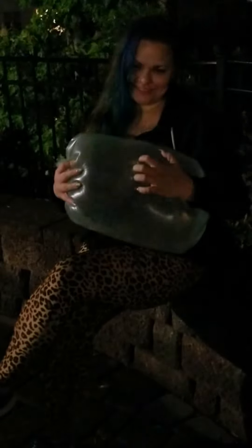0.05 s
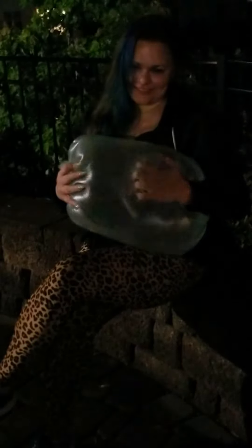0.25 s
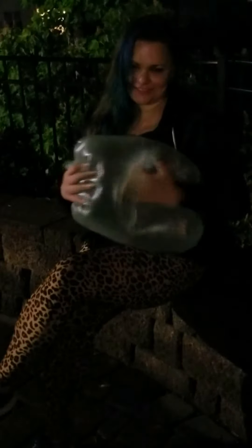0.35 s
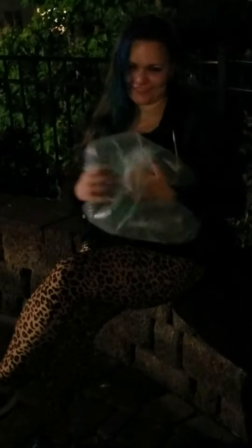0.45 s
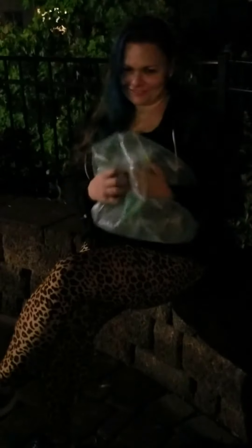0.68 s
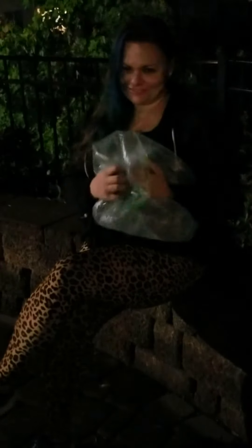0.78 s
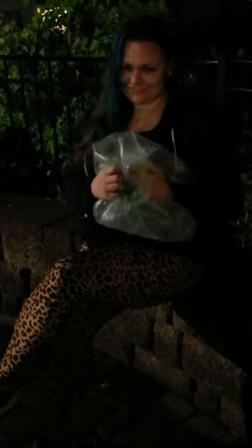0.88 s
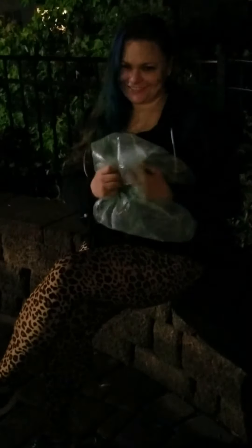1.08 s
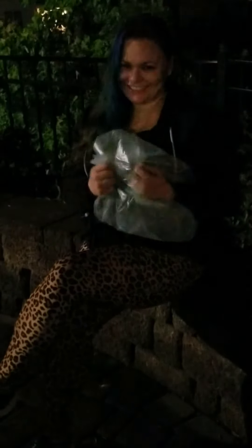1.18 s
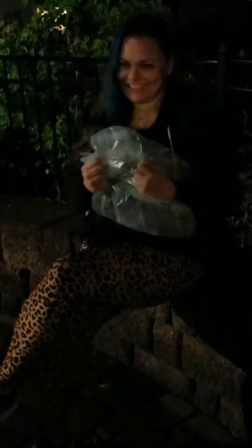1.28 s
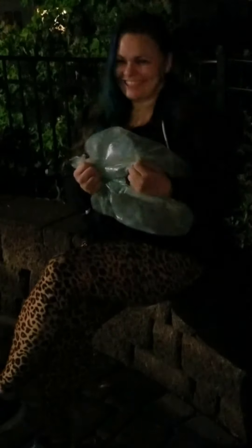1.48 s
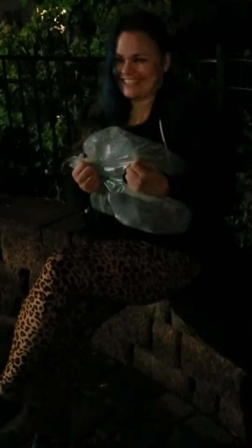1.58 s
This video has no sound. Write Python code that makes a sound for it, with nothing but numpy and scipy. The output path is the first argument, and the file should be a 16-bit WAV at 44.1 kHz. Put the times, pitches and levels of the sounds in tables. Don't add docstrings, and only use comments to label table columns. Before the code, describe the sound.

An inflated plastic bag bursts between two hands in three sharp, overloaded pops, outdoors at night

```python
import sys
import numpy as np
from scipy import signal
from scipy.fft import rfft, irfft
from scipy.io import wavfile
from scipy.ndimage import uniform_filter1d

SR = 44100
rng = np.random.default_rng(int(sys.argv[2]) if len(sys.argv) > 2 else 0)


def dump(signal):
    limited = np.clip(np.atleast_2d(signal).T, -1, 1)
    pcm = np.round(limited * 32767).astype(np.int16)
    wavfile.write(sys.argv[1], SR, pcm)


def to_linear_factor(level_db):
    exponent = np.asarray(level_db, float) / 20
    return 10 ** exponent


N = 72765

# (time [s], boom [dB], deep boom [dB], flap [dB], crack [dB])
SNAPS = [
    (0.2168, -31, -20, -14.5, -29.5),
    (0.2185, -6, -7, -3.5, -14),
    (0.2193, -7.5, -10, -4, -1.5),
    (0.2255, -11, -10, -26, -17),
    (0.2292, -16.5, -10.5, -16.5, -23.5),
    (0.2348, -16, -21, -23, -30.5),
    (0.2396, -13, -17, -4.5, -17.5),
    (0.2443, -15, -16.5, -17, -29),
    (0.3302, 0.5, -8.5, -2.5, -11),
    (0.4232, -1.5, -9, -4, -18),
]
# (frequency ratio [1], level [dB])
BOOM_PARTIALS = [(1.001, -.5), (1.74, -6.5), (2.2, -14)]
BOOM_T60_S = np.array([[.024], [.027]])
# (frequency [Hz], left level [dB], right level [dB])
FLAP_MODES = [(1282, 3, 4), (1472, -15.5, -9.5), (2050, -0.5, -1), (2800, -1, 2), (3295, -4, -3.5),
              (3690, -16, -7.5), (4940, -9.5, -8.5), (6340, -14, -14)]
# (frequency [Hz], level [dB])
CRACK_SPECTRUM = [(290, -22), (500, 0), (1660, -6), (4170, -13), (6160, -10.5), (7120, -14.5),
                  (11100, -17.5), (15800, -40.5)]
# (left level [dB], right level [dB])
PUSH_DB = [-6.5, -8.5]
# (left level [dB], right level [dB])
ECHO_DB = [-20.5, -8.5]
# (frequency [Hz], level [dB])
RATTLE_SPECTRUM = [(120, -24.5), (200, 1.5), (1470, -11.5), (5770, -26), (9440, -31), (10700, -31.5),
                   (12200, -24), (15800, -43.5)]
# (time [s], length [s], level [dB])
RATTLES = [
    (0.2134, 0.035, -18.5),
    (0.3261, 0.019, -18.5),
    (0.4209, 0.014, -18),
]
# (time [s], level [dB], frequency [Hz])
HEAVES = [
    (.238, -16, 109),
    (.343, -39.5, 92),
    (0.342, -24.5, 200),
    (.428, -18, 169.3),
    (0.6, -43, 111.9),
]
# (time [s], frequency [Hz], level [dB], width [cycles])
BUMPS = [
    (.483, 335, -44, 3),
    (1.513, 290, -39, 2.2),
    (1.531, 320, -49, 4.5),
]
# (time [s], level [dB])
FLOW = [(.213, -77.5), (.22, -34.5), (.26, -36), (.33, -33.5), (.37, -35.5), (.42, -39), (.455, -44.5),
        (.482, -42), (.5, -53.5), (.56, -57)]
# (frequency [Hz], level [dB])
JET_SPECTRUM = [(88, -41.5), (150, -8.5), (450, -10.5), (1000, -6.5), (1450, -11), (2100, -8),
                (2800, -11.5), (15800, -25)]
# (time [s], frequency [Hz], level [dB])
WHISTLE = [(.246, 1350, -30.5), (.27, 1344, -31.5), (.29, 1330, -33), (.301, 1268, -37.5),
           (.325, 1270, -40)]
# (time [s], frequency [Hz], level [dB])
SQUEAK = [(.262, 2720, -46), (.27, 2800, -53), (.277, 2890, -45), (.284, 2820, -42), (.29, 2740, -60.5)]
# (time [s], frequency [Hz], level [dB])
SPLIT = [(.303, 1380, -47), (.31, 1350, -47), (.322, 1400, -50)]
# (delay [s], share [1])
PORT_ECHOES = [(.00057, 0.67), (.00085, -0.19), (.00112, -0.5), (.00132, .45), (.0016, -0.12)]
# (frequency [Hz], level [dB])
WIND_SPECTRUM = [(20, -22), (45, -2.5), (70, 2.5), (130, -5), (200, -13.5), (400, -30), (700, -60)]
# (time [s], level [dB])
GUST = [(0, 5.5), (.6, 1), (1.0, -2), (1.15, 2), (1.3, 7), (1.42, 3.5), (1.55, -4), (1.65, -3.5)]
# (time [s], level [dB], frequency [Hz], phase split between ports [rad])
PUFFS = [(0.018, -29.5, 101.6, 1.4), (0.121, -46, 71.4, 0.28), (0.197, -39, 74.6, 0.65),
         (0.529, -53, 81, 1.7), (0.592, -45, 103, .5), (0.632, -38, 100, 0.56), (0.709, -36.5, 63.3, .5),
         (.775, -40.5, 90, 1.3), (0.82, -34, 71.1, 0.31), (1.05, -44, 79, 0.82), (1.101, -43.5, 64.3, .5),
         (1.128, -43, 98, 1.17), (1.226, -36.5, 90, 0.74), (1.286, -39, 100, 0.65),
         (1.323, -36.5, 114, 0.94), (1.37, -39.5, 69.7, 1.8), (1.496, -40.5, 74.8, 0.3)]
# (start [s], length [s], frequency [Hz], level [dB], right port phase lag [rad])
INSECTS = [(0, 0.06, 1123, -57.5, 7.5), (0.546, 0.18, 2790, -63.5, 0), (0.565, 0.27, 2650, -60.5, 4),
           (.68, 0.23, 895.4, -61, 4), (0.794, 0.11, 2930, -62.5, 2), (.68, 0.19, 1198, -65.5, -1),
           (.9, .16, 2480, -67.5, 5.5), (.92, .13, 2840, -63.5, -2.1), (1.102, 0.25, 900, -58.5, 2.4),
           (1.13, 0.22, 1130, -62.5, -0.98), (1.02, 0.11, 3150, -67, 1), (1.159, 0.13, 3140, -65, 2),
           (1.384, 0.26, 2320, -61, 2.5), (1.43, .06, 2800, -63, 4), (1.512, 0.12, 2720, -60.5, 4),
           (1.361, 0.075, 1089, -63.5, -0.5), (1.5, 0.12, 1189, -60.5, 0.8), (1.498, 0.17, 919, -63, 3.5)]
# (frequency [Hz], level [dB])
NIGHT_SPECTRUM = [(200, -6.5), (350, -5), (700, -20.5), (1120, -6.5), (1630, -12), (2880, -11.5),
                  (3460, -17), (15800, -25)]
# (frequency [Hz], level [dB])
FAR_SPECTRUM = [(120, -31.5), (220, 1), (400, -3.5), (700, -11), (1100, -9.5), (1800, -29), (15800, -70)]
# (time [s], level [dB])
FAR_SWELL = [(0, 5), (.2, 2.5), (.5, 6), (0.749, 1.5), (.9, -3.5), (1.15, -2.5), (1.4, -2.5), (1.65, -1)]
# (frequency [Hz], correlation [1])
NIGHT_LIKENESS = [(300, .45), (800, -0.96), (1150, 0.56), (1700, -0.78), (2300, -0.14), (5000, .1),
                  (8000, .5), (15000, 0.38)]
# (frequency [Hz], left minus right [dB])
NIGHT_LEAN = [(200, -2.5), (3000, -1.5), (5000, 1.5), (8000, 5), (15000, 11)]

RIGHT_LAG_S = 0.00012
EVENT_SAMPLES = 2600
SWING_HALF_S = .05


def bag():
    body = snaps() + rattle() + collapse() + bumps() + jet()
    return ports(body) + slit(WHISTLE, octave_db=-14) + slit(SQUEAK) + slit(SPLIT)


def snaps():
    out = np.zeros((2, N))
    damp_s = .003
    t = np.arange(EVENT_SAMPLES) / SR
    for s, *levels_db in SNAPS:
        ends_s = [start + length for start, length, _ in RATTLES]
        cutoff_s = min(end for end in ends_s if end > s - .01) - s
        damping = np.exp(-np.maximum(t - cutoff_s, 0) / damp_s)
        add(out, s, snap(*levels_db) * damping)
    return out


def snap(boom_db, deep_db, flap_db, crack_db):
    cavity_hz, deep_hz, boom_right_db = 381, 294, -2
    flap_t60_s, crack_t60_s = .014, .011
    push_s, rise_s, echo_s = 0.00032, 0.00029, .0022
    t = np.arange(EVENT_SAMPLES) / SR - np.array([[0], [RIGHT_LAG_S]])
    rise = np.clip(t / rise_s, 0, 1)

    boom = to_linear_factor(deep_db - boom_db - 60 * t / BOOM_T60_S) * np.cos(2 * np.pi * deep_hz * t)
    for ratio, db in BOOM_PARTIALS:
        decay = to_linear_factor(db - 60 * ratio * t / BOOM_T60_S)
        boom += decay * np.cos(2 * np.pi * cavity_hz * ratio * t)
    push = to_linear_factor(PUSH_DB)[:, None] * (1 - t / push_s) * np.exp(-t / push_s)
    low = rise * to_linear_factor(boom_db) * (boom * to_linear_factor([[0], [boom_right_db]]) + push)

    flap = np.zeros_like(t)
    for hz, *port_db in FLAP_MODES:
        detuned_hz = hz * rng.uniform(0.89, 1.015)
        flap += to_linear_factor(port_db)[:, None] * np.sin(2 * np.pi * detuned_hz * t)
    flap *= to_linear_factor(flap_db - 60 * t / flap_t60_s) / 2
    crack = to_linear_factor(crack_db - 60 * t / crack_t60_s) * noise(CRACK_SPECTRUM, 0.53, size=EVENT_SAMPLES)
    high = rise * (flap + crack)
    echo = to_linear_factor(ECHO_DB)[:, None] * np.roll(high, round(echo_s * SR), axis=1)
    return low + high + echo


def rattle():
    out = np.zeros((2, N))
    rise_s, fade_db, stop_s = 0.0036, -5, 0.0013
    t = np.arange(EVENT_SAMPLES) / SR
    for s, length_s, db in RATTLES:
        shape = np.clip(t / rise_s, 0, 1) * to_linear_factor(fade_db * t / length_s)
        shape /= 1 + np.exp((t - length_s) / stop_s * 4)
        add(out, s, to_linear_factor(db) * shape * noise(RATTLE_SPECTRUM, 0.67, size=EVENT_SAMPLES))
    return out


def collapse():
    out = np.zeros((2, N))
    for s, db, hz in HEAVES:
        add(out, s - SWING_HALF_S, to_linear_factor(db) * swing(hz, 0.65, 1.7) * to_linear_factor([[0], [1.5]]))
    return out


def bumps():
    out = np.zeros((2, N))
    for s, hz, db, cycles in BUMPS:
        add(out, s - SWING_HALF_S, to_linear_factor(db) * swing(hz, cycles, 1.5) * to_linear_factor([[-2], [1.5]]))
    return out


def jet():
    wide_s, narrow_hz, narrow_share = 0.36, 2411, .35
    t = np.arange(N) / SR
    likeness = [(200, 1.0), (4000, 0.57), (15000, .6)]
    air = patchy(JET_SPECTRUM, likeness, [(200, -1), (15000, 1.5)], patch_db=3.5)
    air[1] = np.roll(air[1], round(RIGHT_LAG_S * SR))
    low = signal.filtfilt(*signal.butter(2, narrow_hz, fs=SR), air)
    air -= (t < wide_s) * (1 - narrow_share) * low
    flow_db = np.interp(t, *np.transpose(FLOW), left=-99, right=-99)
    return to_linear_factor(flow_db + 2.0 * drift(88)) * air


def slit(points, octave_db=-40):
    pan_db, wobble = -4.5, .004
    t = np.arange(N) / SR
    s, hz, db = np.transpose(points)
    wavering_hz = np.interp(t, s, hz) * (1 + wobble * drift(90)[0])
    phase = 2 * np.pi * np.cumsum(wavering_hz) / SR
    fade_in = np.clip((t - s[0] + 0.0085) / 0.0049, 0, 1)
    fade_out = np.clip((s[-1] + .01 - t) / .005, 0, 1)
    level = np.sqrt(2) * fade_in * fade_out * to_linear_factor(np.interp(t, s, db) + .6 * drift(80)[0])
    tone = np.sin(phase) + to_linear_factor(octave_db) * np.sin(2 * phase)
    return level * tone * to_linear_factor([[pan_db / 2], [-pan_db / 2]])


def ports(pair):
    n = np.arange(128)
    taps = np.zeros(128)
    for delay_s, share in PORT_ECHOES:
        taps += share * np.exp(-(n - delay_s * SR) ** 2 / 12) / np.sqrt(12 * np.pi)
    taps[0] += 0.87
    return np.array([pair[0], signal.oaconvolve(pair[1], taps)[:N]])


def wind():
    wind_db, lump_db, lean_db = -55, 1, -3.5
    gust_db = np.interp(np.arange(N) / SR, *np.transpose(GUST))
    level_db = wind_db + gust_db + lump_db * drift(14, channels=2)
    out = to_linear_factor(level_db) * noise(WIND_SPECTRUM, 0.091)
    for s, db, hz, split in PUFFS:
        pair = np.array([swing(hz, 0.88, 2.1 + split), swing(hz, 0.27, 2.2 - split)])
        skip = max(round((SWING_HALF_S - s) * SR), 0)
        add(out, s - SWING_HALF_S, to_linear_factor(db) * pair[:, skip:])
    return out * to_linear_factor([[lean_db / 2], [-lean_db / 2]])


def insects():
    out = np.zeros((2, N))
    for s, length_s, hz, db, lag in INSECTS:
        n = round(length_s * SR)
        waver, throb = drift(26.5, channels=2)[:, :n]
        phase = 2 * np.pi * np.cumsum(hz + 24 * waver) / SR
        level = to_linear_factor(db + 2.6 * throb) * np.sqrt(np.hanning(n))
        add(out, s, level * np.sin([phase, phase - lag]))
    return out


def night():
    far_db, night_db = -61.5, -57
    swell_db = np.interp(np.arange(N) / SR, *np.transpose(FAR_SWELL))
    far = to_linear_factor(far_db + swell_db) * patchy(FAR_SPECTRUM, NIGHT_LIKENESS, NIGHT_LEAN, patch_db=2.0)
    return far + to_linear_factor(night_db) * patchy(NIGHT_SPECTRUM, NIGHT_LIKENESS, NIGHT_LEAN, patch_db=2.0)


def swing(hz, cycles, phase):
    t = np.arange(-SWING_HALF_S, SWING_HALF_S, 1 / SR)
    return np.exp(-(t * hz / cycles) ** 2) * np.sin(2 * np.pi * hz * t + phase)


def noise(spectrum, same=.5, size=N):
    a, b = rng.standard_normal((2, size))
    pair = rfft([a, same * a + np.sqrt(1 - same ** 2) * b])
    hz = np.fft.rfftfreq(size, 1 / SR)
    return evened(irfft(pair * to_linear_factor(read(spectrum, hz)), size))


def patchy(spectrum, same, lean, patch_db, size=(5, 12)):
    hz = np.fft.rfftfreq(1024, 1 / SR)
    a, b, c, d, patch = rng.standard_normal((N // 256 + 5, 513, 5)).T
    patch = uniform_filter1d(patch, size[0], 0)
    patch = evened(uniform_filter1d(patch, size[1], 1))
    same = np.clip(read(same, hz), -.9, 1)[:, None]
    lean = to_linear_factor(read(lean, hz)[:, None] / 2)
    left = a + 1j * b
    right = same * left + np.sqrt(1 - same ** 2) * (c + 1j * d)
    z = np.array([left * lean, right / lean]) / np.sqrt(1 + same)
    z = z * to_linear_factor(read(spectrum, hz)[:, None] + patch_db * patch)
    return evened(signal.istft(z, nperseg=1024, noverlap=768)[1][:, :N])


def drift(hz, channels=1):
    z = rfft(rng.standard_normal((channels, N)))
    return evened(irfft(z / (1 + (np.fft.rfftfreq(N, 1 / SR) / hz) ** 4), N))


def evened(x):
    return x / np.sqrt(np.mean(x ** 2) + 1e-20)


def read(points, hz):
    f, value = np.transpose(points)
    return np.interp(np.log(hz + 1), np.log(f + 1), value)


def add(mix, s, sound):
    part = mix[:, max(round(s * SR), 0):][:, :sound.shape[-1]]
    part += sound[..., :part.shape[1]]


def scene():
    return bag() + wind() + insects() + night()


def top_cut(x):
    return signal.sosfilt(signal.butter(12, 15900, fs=SR, output="sos"), x)


def record(dry):
    clip, edge_hz = .97, 15900
    clipped = np.clip(dry, -clip, clip)
    mix = signal.oaconvolve(clipped, signal.firwin(255, edge_hz, fs=SR)[None], "same")
    return top_cut(mix)


dry = scene()
out = record(dry)
dump(out)
```